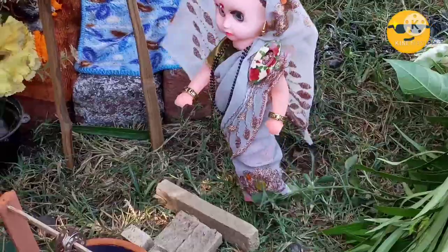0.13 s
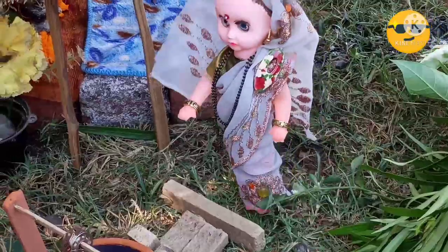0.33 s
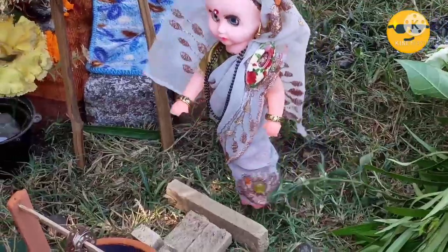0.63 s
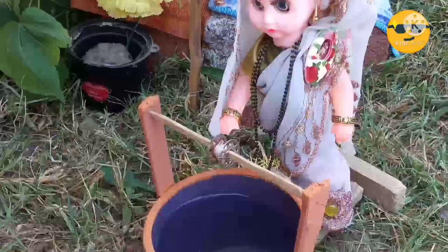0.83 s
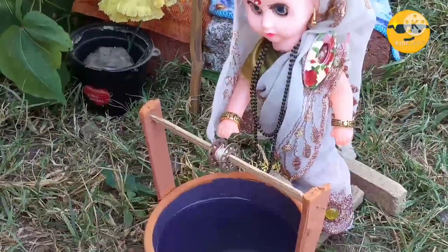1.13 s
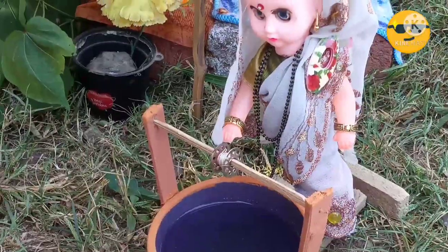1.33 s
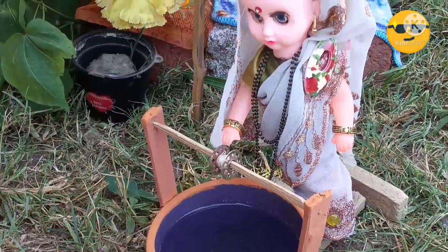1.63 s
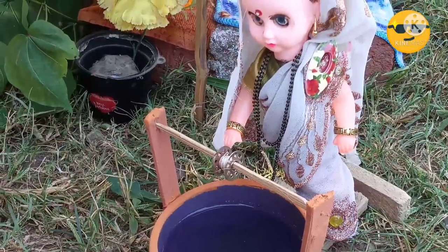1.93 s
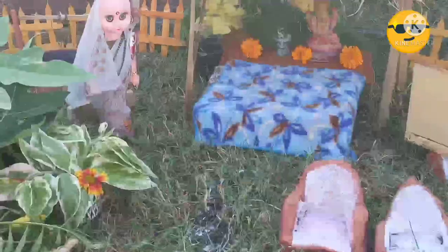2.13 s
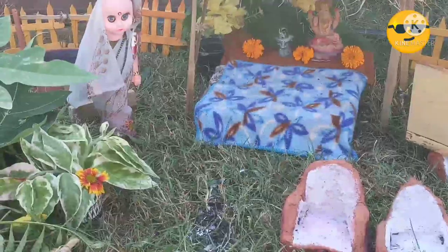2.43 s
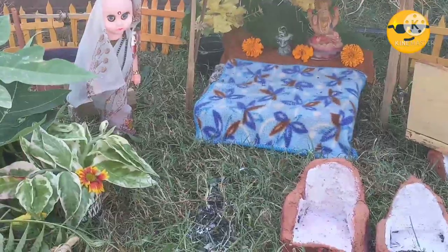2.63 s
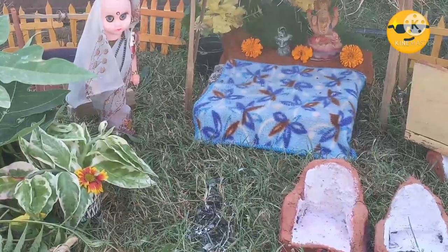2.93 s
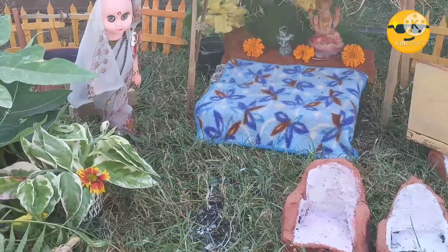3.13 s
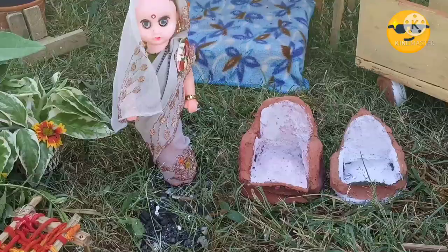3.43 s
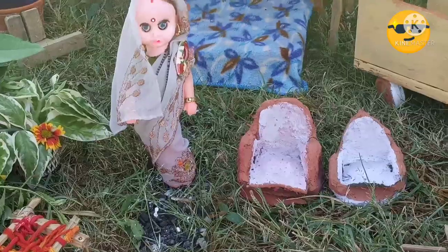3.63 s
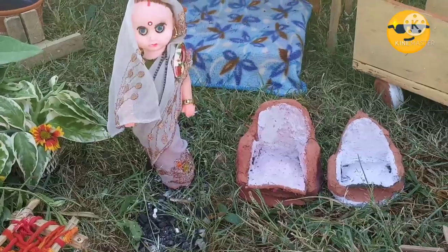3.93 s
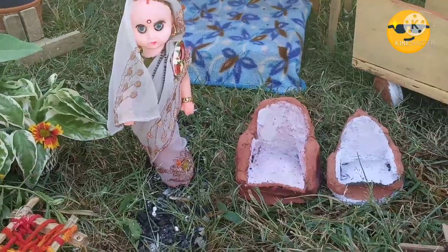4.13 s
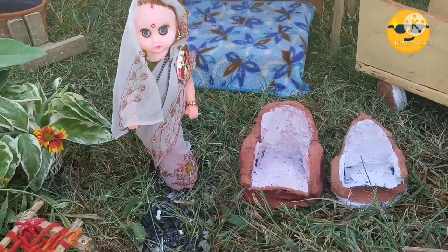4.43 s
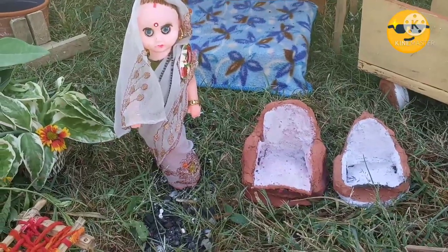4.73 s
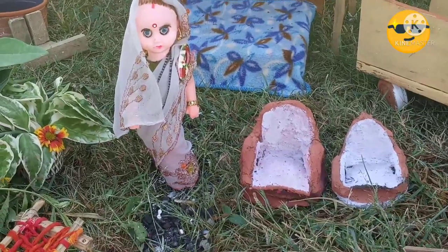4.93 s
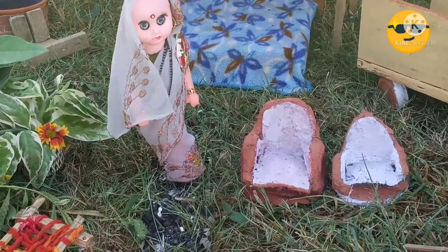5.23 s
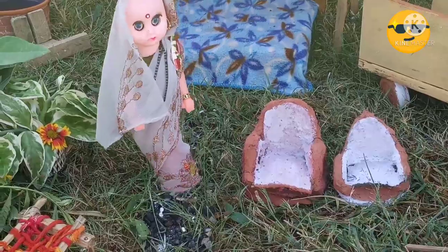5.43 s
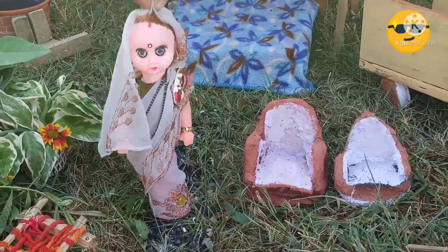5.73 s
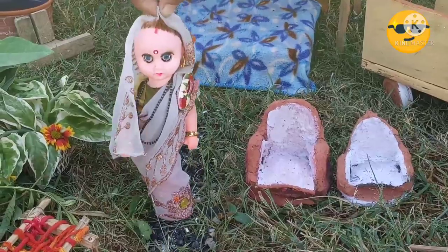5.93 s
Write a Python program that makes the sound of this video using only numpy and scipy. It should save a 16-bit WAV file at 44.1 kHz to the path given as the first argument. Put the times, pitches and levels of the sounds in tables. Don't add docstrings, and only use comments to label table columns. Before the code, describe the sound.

A small stiff broom scratches rough ground in alternating push and pull strokes, each landing with a crunch and snapping loose gritty ticks.

```python
import sys
import numpy as np
from scipy import signal
from scipy.fft import rfft, irfft, next_fast_len
from scipy.io import wavfile
from scipy.ndimage import uniform_filter1d

SR = 44100
rng = np.random.default_rng(int(sys.argv[2]) if len(sys.argv) > 2 else 0)


def dump(signal):
    limited = np.clip(np.atleast_2d(signal).T, -1, 1)
    pcm = np.round(limited * 32767).astype(np.int16)
    wavfile.write(sys.argv[1], SR, pcm)


def magnitude_from_level(level_db):
    exponent = np.asarray(level_db, float) / 20
    return 10 ** exponent


N = 268083
UNEVEN_S, UNEVEN_DB, JOLT_UNEVEN_S = .0006, 1.2, .0011

# landing_s, level_db, lift_s, catch_s, bright_hz (brightest pitch of the landing)
PUSHES = [
    (0.3447, -0.5, .98, 0.6363, 5200),
    (1.623, 0.5, 2.43, 1.9182, 4000),
    (3.37, 2, 4.0, 3.6627, 3600),
    (4.6531, 2.5, 5.5, 4.9431, 3800),
]
# contact, start_s (after landing), rise_s, hold_s, fade_t60_s, level_db
PUSH_MOVES = [
    ("scrape", -.003, .003, .008, .03, -45),
    ("land", .001, .008, .021, .045, -33),
    ("press", .0, .03, .01, .4, -41),
    ("drag", .05, .03, .25, .25, -54),
    ("scrape", .284, .011, .012, .14, -40),
    ("trail", .2, .1, .1, 1.4, -68),
]
PUSH_CONTACTS = {"land": (2.5, -6, 0.1, -6.5, .95), "press": (2, -9, -3, -13, .6),
                 "drag": (0.5, -5, -2, -10, .25), "scrape": (-13, -12, 0.1, -20, .05),
                 "trail": (-3, -5, -1.5, -11, .2)}
# pitch_hz, width_hz, level_db
PUSH_MODES = [(524, 44, -1), (610, 70, 4), (1113, 82, -2), (1943, 23, -1.5), (2651, 25, -5.5),
              (3100, 90, -10.5), (3444, 35, -11.5), (3924, 110, 3), (4335, 200, -3.5), (4975, 140, -2),
              (5400, 49, -5), (5650, 46, -1.5), (6596, 85, -11), (6830, 60, -21), (9140, 680, -19.5)]
# start_s (after landing), peak_db, pitch_ratio (of bright_hz), low_db
PUSH_JOLTS = [(.008, -17, 1.03, -5), (.013, -16, 0.98, -6), (.022, -17, 0.97, -9), (.025, -18, 0.95, -10),
              (.028, -19, 1.02, -5), (.042, -27, 0.8, -5)]


def pushes():
    sweep = sweeping(stroke(PUSH_MOVES, PUSH_CONTACTS, PUSH_MODES), PUSHES)
    return sweep + jolts(landing_jolts(PUSH_JOLTS, PUSHES), PUSH_MODES)


# landing_s, level_db, lift_s, catch_s, bright_hz (brightest pitch of the landing)
PULLS = [
    (-.306, 3, .34, -0.1075, 2400),
    (0.975, 1.9, 1.56, 1.1705, 2450),
    (2.2576, -2, 2.384, 2.456, 2400),
    (2.7205, 1, 4, 2.9168, 2400),
    (3.999, 3, 4.64, 4.1988, 2300),
    (5.2797, 1.5, 5.67, 5.477, 2650),
]
# contact, start_s (after landing), rise_s, hold_s, fade_t60_s, level_db
PULL_MOVES = [
    ("land", .003, .008, .024, .06, -33),
    ("press", .008, .02, .012, .16, -34.5),
    ("drag", .05, .03, .14, .25, -60.5),
    ("scrape", .122, .008, .006, .035, -41),
    ("scrape", .18, .02, .025, .09, -46),
    ("brush", .27, .045, .032, .1, -53),
    ("trail", .2, .1, .05, 1.0, -64),
]
PULL_CONTACTS = {"land": (-2, -4, -9, -22, .95), "press": (1.5, -6, -13, -32, .9),
                 "drag": (1, 3, 2, -13, .25), "scrape": (-13, -3, 0.1, -30, .25),
                 "brush": (2, -10, -7, -19, .1), "trail": (-2, -7, -1, -10, .15)}
# pitch_hz, width_hz, level_db
PULL_MODES = [(426, 43, -2), (502, 46, 3.5), (763, 46, 1), (1173, 128, -6), (1372, 26, 0.5), (1745, 35, -4),
              (1932, 122, 3), (2400, 50, -6), (3007, 61, -11), (3220, 34, -3), (3420, 34, -15.5),
              (3880, 44, -12.5), (5070, 60, -14), (6370, 90, -19), (6800, 100, -27), (8510, 410, -24)]
# start_s (after landing), peak_db, pitch_ratio (of bright_hz), low_db
PULL_JOLTS = [(.0076, -18, 0.99, -8), (.0125, -21, 1.1, -3), (.02, -23, 0.98, 0), (.031, -22, 0.84, -1)]


def pulls():
    sweep = sweeping(stroke(PULL_MOVES, PULL_CONTACTS, PULL_MODES), PULLS)
    return sweep + jolts(landing_jolts(PULL_JOLTS, PULLS), PULL_MODES)


BAND_EDGES_HZ = [300, 1500, 2800, 6100, 10500]
# pitch_hz, level_db (per Hz)
GRIT = [(250, -27.5), (520, -13.5), (700, 1), (1000, -2.5), (1500, -13), (2200, -16), (3870, -3),
        (5750, -6.5), (6150, -22.5), (7100, -22.5), (7500, -36), (9800, -30), (10700, -47.5)]


def stroke(moves, contacts, modes):
    t = np.arange(int(.7 * SR)) / SR - .02
    tips = slips(len(t), per_s=6000.0, spread_db=2.5, clump_db=3.44)
    head = 0
    for k, (hz, width_hz, db) in enumerate(modes):
        ring = resonance(resonance(tips, hz, 0.99 * width_hz), hz, 4 * 0.99 * width_hz)
        head = head + (-1) ** k * magnitude_from_level(db) * ring

    grains = slips(len(t), per_s=4000.0, spread_db=4.0, clump_db=3.5)
    grains = grains + 0.19 * np.roll(grains, 25) - 0.24 * np.roll(grains, 83) + 0.26 * np.roll(grains, 211)
    grit = coloured(grains, GRIT)

    rung, scratched = 0, 0
    for contact, start_s, rise_s, hold_s, t60_s, db in moves:
        *colour_db, share = contacts[contact]
        fade_db = -60 * np.maximum(t - start_s - rise_s - hold_s, 0) / t60_s
        shape = np.clip((t - start_s) / rise_s, 0, 1) ** 2 * magnitude_from_level(db + fade_db)
        power = (magnitude_from_level(np.array(colour_db))[:, None] * shape) ** 2
        share = np.clip(share, 0, 1) ** np.array([[2], [1], [1], [4]])
        share = share * [[1], [1], [1], [.6]]
        rung = rung + share * power
        scratched = scratched + (1 - share) * power

    out = 0
    for k, (low_hz, high_hz) in enumerate(zip(BAND_EDGES_HZ, BAND_EDGES_HZ[1:])):
        out = out + np.sqrt(rung[k]) * evened(head, low_hz, high_hz)
        out = out + np.sqrt(scratched[k]) * evened(grit, low_hz, high_hz)
    return out


def slips(size, per_s, spread_db, clump_db):
    clumps = rms_one(signal.lfilter([1], [1, -1.98, .9801], rng.standard_normal(size)))
    sizes = magnitude_from_level(spread_db * np.minimum(rng.exponential(1, size), 4) + clump_db * clumps)
    return sizes * rng.choice([-1, 1], size) * (rng.random(size) < per_s / SR)


def sweeping(sound, strokes):
    out = np.zeros(N + 2 * SR)
    for landing_s, db, lift_s, *_ in strokes:
        start = round((landing_s - .02 + 1) * SR)
        left_s = lift_s - landing_s + .02 - np.arange(len(sound)) / SR
        out[start:start + len(sound)] += magnitude_from_level(db) * sound * np.clip(left_s / .003, 0, 1)
    return out[SR:SR + N]


def landing_jolts(pattern, strokes):
    events = []
    for landing_s, _, lift_s, _, bright_hz in strokes:
        harder_db = 10 * np.log2(bright_hz / strokes[2][4])
        for s, peak_db, ratio, low_db in pattern:
            late, loud = rng.standard_normal(2)
            if .01 < landing_s + s < lift_s:
                at_s = landing_s + s + JOLT_UNEVEN_S * late * (s != 0)
                peak_db = peak_db + harder_db + UNEVEN_DB * loud
                events.append((at_s, peak_db, ratio * bright_hz, low_db - harder_db))
    return events


def jolts(events, modes):
    out, t = np.zeros(N + SR), np.arange(1800) / SR
    hz, width_hz, level_db = np.transpose(modes)[:, :, None]
    decay = np.exp(-np.pi * (0.89 * width_hz + 60) * t)
    rings = -magnitude_from_level(level_db) * np.sin(2 * np.pi * hz * t) * decay
    rings = rings * np.minimum(t * hz / 1.3, 1)
    thud = magnitude_from_level(-33.0) * np.sin(2 * np.pi * 170 * t) * np.exp(-t / 0.0053)
    crack = -.7 * np.sin(2 * np.pi * 3000 * t) * np.exp(-t / 0.00013)
    luck_db = rng.normal(0, 1.6, (len(events), len(modes), 1))
    for (s, peak_db, bright_hz, low_db), own_db in zip(events, luck_db):
        near = magnitude_from_level(own_db) * np.exp(-(np.log(hz / bright_hz) / 0.51) ** 2)
        high = np.sum(near * rings * (hz > 1500), axis=0)
        low = np.sum(magnitude_from_level(own_db) * rings * (hz <= 1500), axis=0)
        high = high / abs(high).max()
        low = magnitude_from_level(low_db - 4) * low / abs(low).max()
        at = round(s * SR) - 8
        out[at:at + len(t)] += magnitude_from_level(peak_db - 5) * (high + low + thud + crack)
    return out[:N]


# start_s (from the catch), peak_db, pitch_hz, knock_db
PUSH_FLICKS = [(-.170, -29, 3600, 1), (-.1255, -29, 3850, -6), (-.094, -25, 3900, -6),
               (-.092, -33, 2800, 4), (-.025, -24.5, 3800, -3), (-.010, -36, 3600, -15),
               (0, -14, 3750, -30), (.003, -21.5, 3800, -24), (.018, -33, 4400, -8), (.1, -39, 3750, -8)]
# start_s (from the catch), peak_db, pitch_hz, knock_db
PULL_FLICKS = [(-.132, -32, 2400, 3), (-.119, -29, 2250, 2), (-.0695, -30, 3450, -10),
               (-.0650, -31, 2950, -22), (-.0613, -29, 2800, -19), (-.053, -32, 2950, -20),
               (-.033, -29, 2750, -22), (0, -13.5, 3400, -29), (.009, -29, 3050, -17),
               (.018, -31, 3600, -20), (.0237, -19.5, 3480, -31), (.036, -31, 3400, -20),
               (.2, -30.5, 4000, -7), (.25, -32.5, 3780, -11), (.2522, -34, 3870, -5),
               (.2975, -36, 4150, -23)]
# start_s,
# peak_db, pitch_hz, knock_db
EXTRA_GRAINS = [(0.6394, -16, 4070, -28), (1.1058, -22, 3060, -17), (1.1191, -22, 2800, -25),
                (1.1768, -20, 3200, -20), (1.3813, -30, 3850, -10), (2.8534, -22, 2900, -23),
                (2.9518, -20, 3540, -27), (3.3645, -38, 4500, 12), (4.1348, -21, 2930, -25),
                (4.6445, -38, 4700, 13), (4.9207, -23.5, 3900, -5), (4.9487, -20, 3470, -29)]


def flicked_grains():
    return flicks(caught_grains(PUSH_FLICKS, PUSHES) + caught_grains(PULL_FLICKS, PULLS) + EXTRA_GRAINS)


def caught_grains(pattern, strokes):
    events = []
    for _, db, lift_s, catch_s, _ in strokes:
        for s, peak_db, hz, knock_db in pattern:
            late, loud = rng.standard_normal(2)
            if .01 < catch_s + s < lift_s:
                at_s = catch_s + s + UNEVEN_S * late * (s != 0)
                events.append((at_s, peak_db + db / 2 + UNEVEN_DB * loud, hz, knock_db))
    return events


def flicks(events):
    out, t = np.zeros(N + SR), np.arange(-30, 500) / SR
    after = np.maximum(t, 0)
    rattles = rms_one(band(rng.standard_normal((len(events), len(t))), 1700, 5100))
    for (s, peak_db, hz, knock_db), rattle in zip(events, rattles):
        tick = np.cos(2 * np.pi * hz * (t - .00003)) * np.exp(-(t * hz / .5) ** 2)
        echo = 0.23 * np.roll(tick, 25)
        tail = 0.081 * rattle * (t > 0) * np.exp(-after / 0.0023)
        knock_shape = (after / 0.0019) * np.exp(1 - after / .0012)
        knock = magnitude_from_level(knock_db - 8.5) * np.sin(2 * np.pi * 750 * after) * knock_shape
        at = round(s * SR) - len(t[t < 0]) + 9
        out[at:at + len(t)] += magnitude_from_level(peak_db) * (tick + echo + tail + knock)
    return signal.sosfilt(signal.butter(2, [350, 7000], "band", fs=SR, output="sos"), out[:N])


# start_s, level_db
HISS = [(0, -55), (.33, -57.5), (.8, -65), (2.38, -64.5), (2.39, -65), (2.68, -65.5), (2.69, -58),
        (3.3, -65.5), (4.6, -65.5), (5.67, -65.5), (5.68, -69), (5.88, -68.5), (5.89, -61.5), (6.08, -62)]
# pitch_hz, level_db (per Hz)
HISS_COLOUR = [(200, -24), (300, -7.5), (650, -1.5), (1200, -3), (1630, -4.5), (2300, -6), (2900, -17),
               (5600, -10.5), (7100, -24.5), (7800, -32), (10500, -42)]
# pitch_hz, level_db (per Hz)
RUMBLE = [(12, -15), (40, -22), (55, -8), (75, -19.5), (100, 2), (135, -10.5), (150, -10.5), (178, -1),
          (210, -8), (350, -13), (600, -23)]
# start_s, length_s, pitch_hz, level_db
HUMS = [
    (1.108, 0.13, 395, -60),
    (1.382, 0.1, 334, -63),
    (3.082, 0.048, 410, -57.5),
]


def yard():
    t = np.arange(N) / SR
    s, level_db = np.transpose(HISS)
    hiss = magnitude_from_level(np.interp(t, s, level_db)) * coloured(rng.standard_normal(N), HISS_COLOUR)
    hums = 0
    for start_s, length_s, hz, db in HUMS:
        swell = np.sin(np.pi * np.clip((t - start_s) / length_s, 0, 1)) ** .5
        hums = hums + magnitude_from_level(db) * swell * np.sin(2 * np.pi * hz * t)
    return hiss + hums + magnitude_from_level(-64) * coloured(rng.standard_normal(N), RUMBLE)


# pitch_hz, level_db (per Hz)
AIR = [(7000, -14.5), (12000, -1), (14000, -5.5), (14900, 4), (15450, 3), (15550, -27.5)]


def microphone(dry):
    cut = signal.sosfilt(signal.cheby2(10, 50, 11700, fs=SR, output="sos"), dry)
    return cut + magnitude_from_level(-90.5) * coloured(rng.standard_normal(N), AIR)


def rms_one(x):
    return x / np.sqrt(np.mean(x ** 2) + 1e-20)


def coloured(x, spectrum):
    hz, level_db = np.transpose(spectrum)
    size = next_fast_len(len(x))
    axis_hz = np.maximum(np.arange(size // 2 + 1) * SR / size, 1)
    gain = magnitude_from_level(np.interp(np.log(axis_hz), np.log(hz), level_db, left=-90, right=-90))
    return rms_one(irfft(rfft(x, size) * gain, size)[:len(x)])


def resonance(x, hz, width_hz):
    r = np.exp(-np.pi * width_hz / SR)
    poles = [1, -2 * r * np.cos(2 * np.pi * hz / SR), r * r]
    return signal.lfilter(np.array([1, 0, -1]) * (1 - r * r) / 2, poles, x)


def band(x, low_hz, high_hz):
    return signal.sosfilt(signal.butter(4, [low_hz, high_hz], "band", fs=SR, output="sos"), x)


def evened(x, low_hz, high_hz):
    part = band(x, low_hz, high_hz)
    return rms_one(part / uniform_filter1d(part ** 2 + 1e-18, size=900) ** .18)


def scene():
    return np.tile(pushes() + pulls() + flicked_grains() + yard(), (2, 1))


def top_cut(x):
    return signal.sosfilt(signal.butter(12, 15500, fs=SR, output="sos"), x)


def record(dry):
    mix = microphone(dry)
    return top_cut(mix)


dry = scene()
out = record(dry)
dump(out)
```